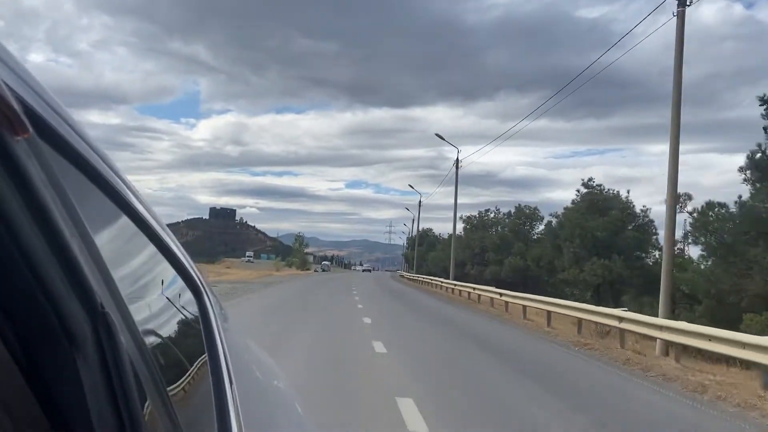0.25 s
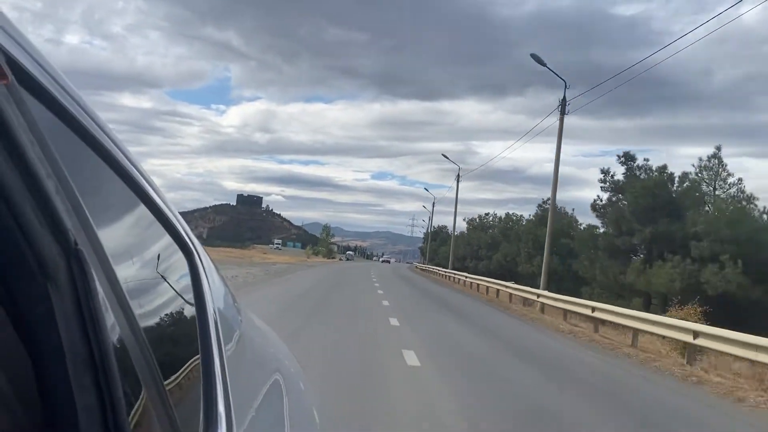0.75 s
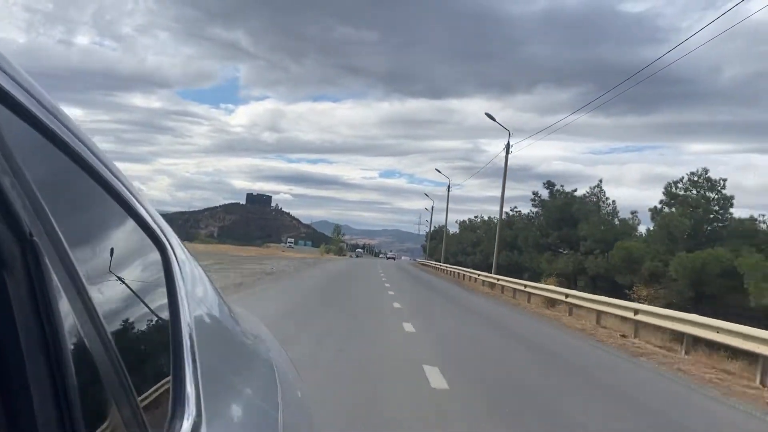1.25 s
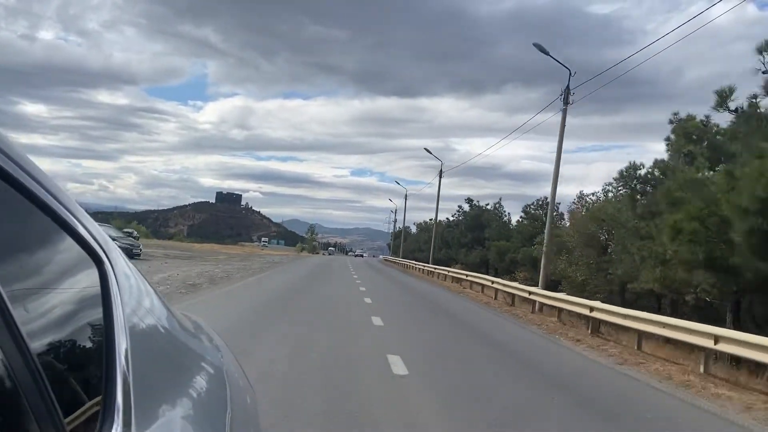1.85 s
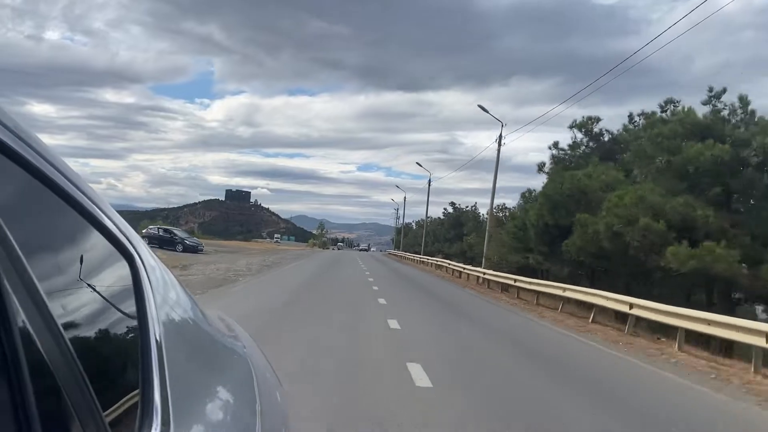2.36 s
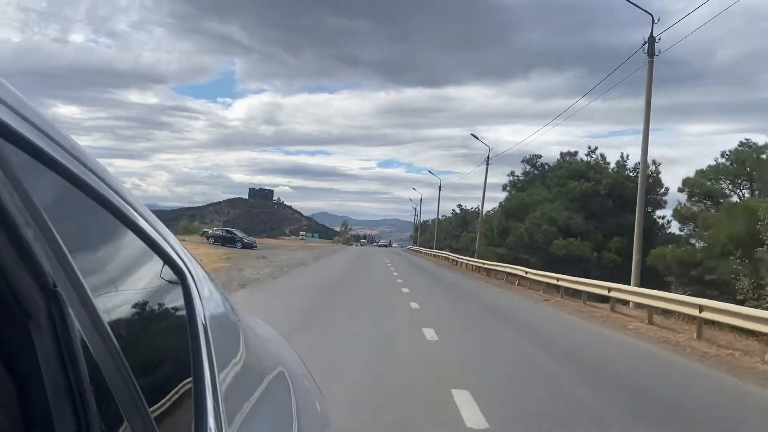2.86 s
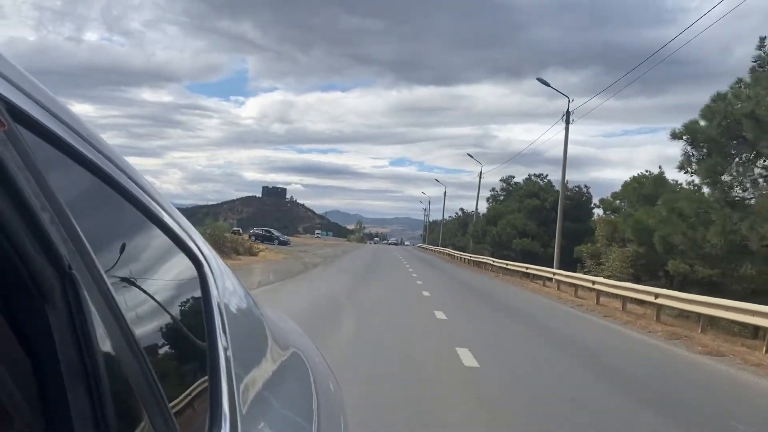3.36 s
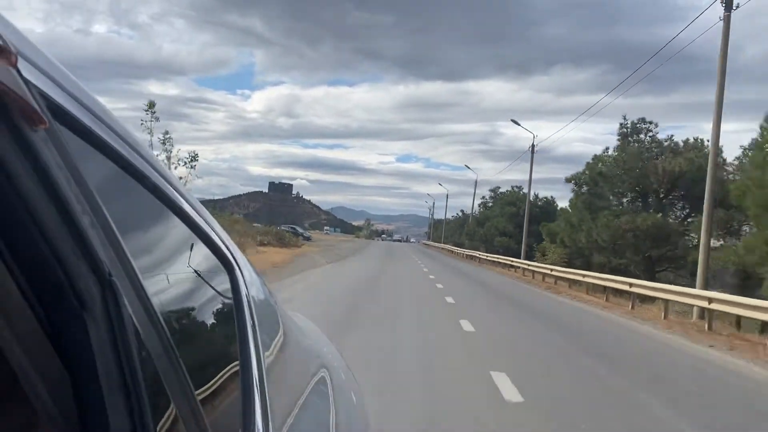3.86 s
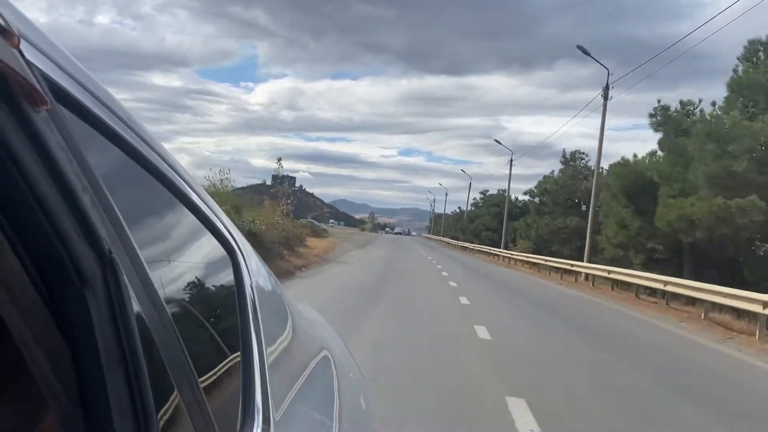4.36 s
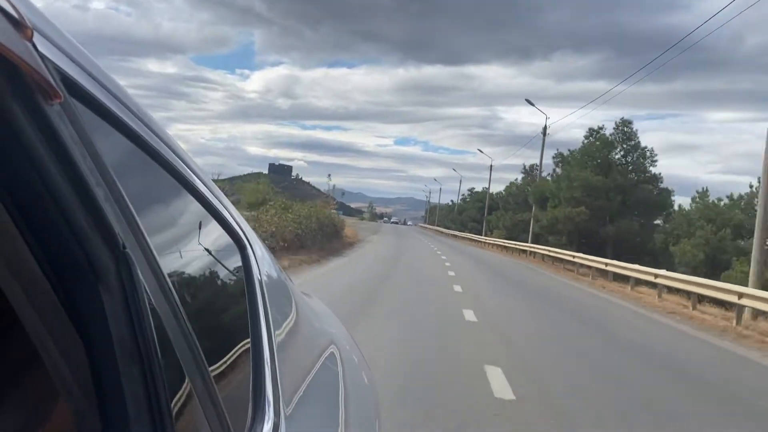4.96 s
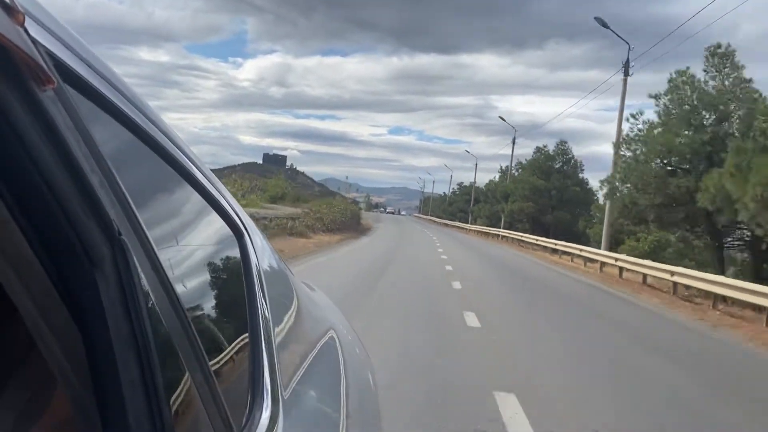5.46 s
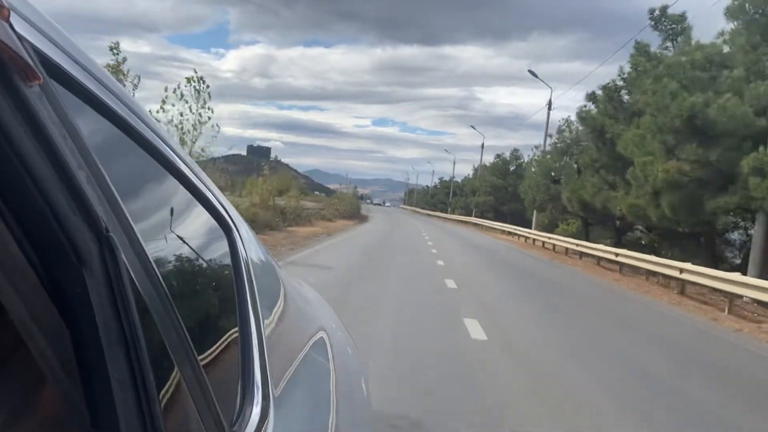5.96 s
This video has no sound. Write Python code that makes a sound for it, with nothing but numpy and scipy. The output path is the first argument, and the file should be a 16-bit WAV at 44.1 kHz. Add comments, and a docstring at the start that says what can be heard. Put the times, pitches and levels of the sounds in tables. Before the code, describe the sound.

Wind strikes the two ports of a handheld microphone outside a moving car's window, very close, dry and outdoors. From 0 s there is low lumpy rumble with a weaker, fluttering rush, strengthening from about 0.4 to 1.1 s with slaps and snaps. It eases around 1.3 s, revives, then dips near 1.8 s. From 2.1 s gusts build, peaking near 2.7 s; after a brief lull around 3 s, a strong, bright, tearing surge fills 3.2-3.6 s with crackling snaps. It sags near 3.9 s, then bursts hard at 4.1-4.5 s with the sharpest snaps and fine ticks. A weaker patch at 4.7-5 s leads to a gust and snap at 5.3 s, a quick drop, and sustained rough blowing from 5.5 s, with a hard snap near 5.8 s. Bass thumps recur throughout; tyre and slipstream hiss swells underneath. It cuts off mid-wind around 6.2 s.

```python
"""Gusts of wind buffet the two microphone ports of a phone held out of the open window of a moving car.
Banded noise on shared random eddies makes a lumpy rumble, a roar, a fluttering rush and a tearing treble.
Timed slaps, treble spits and stalls swing the level; decaying noise makes snaps and ticks, short tones
the shed vortices. Under it runs filtered noise, the hiss of tyres and slipstream, swelling with the gusts."""
import sys
import numpy as np
from scipy import signal
from scipy.fft import rfft, irfft, next_fast_len
from scipy.io import wavfile
from scipy.ndimage import uniform_filter1d

SR = 44100
rng = np.random.default_rng(int(sys.argv[2]) if len(sys.argv) > 2 else 0)


def unload_wav(signal):
    """Save mono or channel-first audio to the path in sys.argv[1] as 16-bit WAV at rate SR, clipped to [-1, 1]."""
    wavfile.write(
        sys.argv[1],
        SR,
        np.round(np.clip(np.atleast_2d(signal).T, -1, 1) * 32767).astype(np.int16),
    )


N = 274302

# eddies slap the ports or spit in the treble:
# (time [s], half-width [s], level change [dB], extra treble [dB], left-right [dB])
SLAPS = [(0.066, 0.0058, 0.5, -5, 1), (0.146, 0.007, 4, -4, 4.5), (0.188, 0.0082, 1.5, -6, 6),
         (0.237, 0.0049, 5.5, 1, 7), (0.287, 0.0036, 6, -7, 10), (0.439, 0.019, 7.5, 1.5, 1.5),
         (0.475, 0.013, 5.5, 3, 1), (0.549, 0.012, 5, 3, 3), (0.647, 0.014, 5, 2, 2),
         (0.706, 0.004, 0.5, 11.5, 11), (0.727, 0.012, 2, -3, 4), (0.792, 0.005, 1.5, 7, 9),
         (0.873, 0.012, 6, -4, 4), (0.904, 0.007, 2.5, 9, 9), (0.963, 0.008, 3.5, 1, 11),
         (1.006, 0.017, 6.5, 0, 6), (1.08, 0.0092, 5, 0.5, 1), (1.197, 0.0035, 3, 8, 12),
         (1.354, 0.011, 5, 2, 1), (1.407, 0.0088, 3, -1, 2), (1.42, 0.004, -1, 9.5, 11),
         (1.446, 0.0049, 11, -3, 4), (1.506, 0.0074, 4.5, -3, 12), (1.535, 0.016, 2, 5, 6),
         (1.657, 0.01, 4.5, -2, 1), (1.691, 0.026, 3, -0.5, 2), (1.796, 0.0086, 8, -14, 5),
         (1.89, 0.011, 5.5, -8, -1), (1.948, 0.0081, 4, -16, 2), (2.043, 0.0033, 9.5, 2.5, 8),
         (2.076, 0.015, 3, -4, 6), (2.098, 0.0051, 5.5, -1, 7), (2.124, 0.0044, 0, 7.5, 14),
         (2.148, 0.0042, 6, 5, 8), (2.256, 0.016, 6.5, 0.5, 5), (2.288, 0.0063, 6.5, -2, 4),
         (2.321, 0.005, 4.5, 3, 5), (2.425, 0.0031, 5.5, 0, 9), (2.5, 0.0082, 5.5, 4.5, 4),
         (2.579, 0.0089, 3, 4.5, 3), (2.621, 0.005, 0, 2, 7), (2.666, 0.003, 6.5, 6, 1),
         (2.727, 0.0084, 3, 3.5, 0), (2.853, 0.008, 4, -1, 1), (2.893, 0.005, 1.5, 0, 9),
         (2.933, 0.0043, 4, -4, -3), (3.072, 0.005, -3, 10, -5), (3.014, 0.0087, 3, 5, -3),
         (3.105, 0.036, 2.5, 0, -1), (3.202, 0.005, 0.5, 5, 6), (3.224, 0.0044, 0.5, 5, 6),
         (3.254, 0.005, 6, 3, 7), (3.287, 0.0044, 6.5, 1, 12), (3.325, 0.01, -0.5, 8, -1),
         (3.412, 0.0046, 4.5, 7, -7), (3.458, 0.0074, -2, 5, 5), (3.521, 0.012, 3, 4, -1),
         (3.622, 0.011, 4, 2.5, -1), (3.683, 0.0043, 0, -2, 10), (3.731, 0.015, 6, -5, 11),
         (3.857, 0.005, 3, -9, -8), (3.959, 0.004, 6.5, -8, -4), (4.002, 0.0056, 5, -1, -5),
         (4.088, 0.0066, 6, 0.5, -3), (4.167, 0.0092, 2, 7, 1), (4.259, 0.005, 1.5, 10.5, 0),
         (4.301, 0.005, -0.5, 5, -2), (4.337, 0.0072, 4, 1, -9), (4.429, 0.0035, 10, 4, 8),
         (4.468, 0.025, 6.5, 4.5, -1), (4.511, 0.0089, 0.5, 4, 0), (4.566, 0.0096, 4.5, 0, -3),
         (4.651, 0.0099, 5.5, 2.5, 7), (4.833, 0.005, 0, -7, -4), (4.856, 0.0069, 6.5, -3, -3),
         (5.011, 0.011, 6, -3, 3), (5.035, 0.0048, 6.5, 0, 6), (5.063, 0.005, 2, -10, 11),
         (5.094, 0.0064, -1, -6, -2), (5.137, 0.0045, 4.5, -4, 10), (5.177, 0.003, -1, 13, -2),
         (5.426, 0.0046, 6, -3, -4), (5.468, 0.004, -2.5, 3, 5), (5.483, 0.0053, 4.5, -3, -7),
         (5.558, 0.005, -2.5, 8, 3), (5.635, 0.006, -1.5, 7, 0), (5.735, 0.0066, -1, 5, 9),
         (5.785, 0.016, 1.5, 10, 2), (5.807, 0.0089, 9.5, 4, 2), (5.856, 0.006, 1.5, 6.5, 6),
         (5.915, 0.0024, 8.5, -1, -5), (6.046, 0.005, 1, 8, -5), (6.092, 0.005, 1.5, 6, 3),
         (6.137, 0.0074, 6, 3.5, 9), (6.202, 0.019, 5, 2.5, -1)]
# random surges of the airflow
SURGE_HZ, SURGE_DB = 22.7, 0.93
# tearing treble: level at zero force, and dB gained per dB of force
TEAR_DB, TEAR_FOLLOWS = -40, 1.01


def from_db(db):
    """Decibels to gain."""
    return 10 ** (np.asarray(db) / 20)


def rms_one(x):
    """Scale to unit power."""
    return x / np.sqrt(np.mean(x ** 2) + 1e-20)


def in_time(rows):
    """One sample-rate curve for each column."""
    s, *columns = np.transpose(rows)
    return [np.interp(np.arange(N) / SR, s, c) for c in columns]


def at_hz(points, hz):
    """Read a table on a log-frequency axis."""
    table = np.array(points)
    return np.interp(np.log(hz), np.log(table[:, 0]), table[:, 1])


def drift(rate_hz):
    """Smooth chance of spread 1 (two-pole low-passed noise), its rare extremes rounded off."""
    # computed at an eighth of the sample rate; the first 4000 values let the filter settle
    r = np.exp(-16 * np.pi * rate_hz / SR)
    white = rng.standard_normal(N // 8 + 4002)
    slow = signal.lfilter([1], [1, -2 * r, r * r], white)[4000:]
    rounded = 4 * np.tanh(rms_one(slow) / 4)
    return np.interp(np.arange(N) / 8, np.arange(len(slow)), rounded)


def at_ports(rate_hz, shared):
    """Smooth chance at the two ports, a share of its power common to both."""
    shared = np.clip(shared, 0, 1)
    own = np.array([drift(rate_hz), drift(rate_hz)])
    return np.sqrt(shared) * drift(rate_hz) + np.sqrt(1 - shared) * own


def coloured(x, spectrum):
    """Give white noise a spectrum; rms 1."""
    size = next_fast_len(N)
    hz = np.maximum(np.fft.rfftfreq(size, 1 / SR), 1)
    return rms_one(irfft(rfft(x, size) * from_db(at_hz(spectrum, hz)), size)[..., :N])


def band(x, low_hz, high_hz):
    """Gentle band-pass."""
    sos = signal.butter(2, [low_hz, min(high_hz, .45 * SR)], "band", fs=SR, output="sos")
    return signal.sosfilt(sos, x)


def evened(x):
    """Even out stereo power over about a thirtieth of a second; quicker flutter stays."""
    power = uniform_filter1d(np.mean(x ** 2, axis=0), size=SR // 30)
    power = uniform_filter1d(power, size=SR // 45)
    return x / np.sqrt(np.maximum(power, 1e-20))


def swells(events):
    """Each event comes on quickly around its moment and fades more slowly; one summed curve per dB column."""
    rise_share, fade_share, reach_s = 0.7, 1.33, .12   # shares of the half-width
    out = np.zeros((len(events[0]) - 2, N))
    for s, width_s, *heights_db in events:
        near = np.arange(max(int((s - reach_s) * SR), 0), min(int((s + reach_s) * SR), N))
        age = (near / SR - s) / width_s
        shape = np.exp(-(age / np.where(age < 0, rise_share, fade_share)) ** 2)
        out[:, near] += np.outer(heights_db, shape)
    return out


def timed_kicks(events, level_db):
    """Single-sample stereo kicks at the listed moments."""
    kicks = np.zeros((2, N))
    for s, peak_db, pan_db in events:
        kicks[:, int(s * SR)] += from_db(peak_db + level_db + np.array([pan_db, -pan_db]) / 2)
    return kicks


def noise_grains(kicks, fall_s, colour):
    """Each kick becomes a decaying grain of random-sign noise, coloured at unchanged overall power."""
    decays = signal.lfilter([1], [1, -np.exp(-1 / (fall_s * SR))], kicks + 1e-18)
    grains = decays * rng.choice([-1, 1], (2, N))
    return coloured(grains, colour) * np.std(grains)


def road_hiss(gust_db):
    """Tyres and slipstream sound from one side: the left port hears them later and turned in phase."""
    # spectrum, relative: (frequency [Hz], density [dB per Hz])
    hiss_colour = [(100, 28), (1000, 35.5), (2500, 12.5), (5000, 13.5), (7000, 7.5), (9000, -1), (11500, 2),
                   (15500, -7)]
    steady_db = -41   # remains in a lull
    start_db, follows, rise_db_per_s = -48, 1.6, 1.75   # slipstream: follows in dB per dB of gust
    lag_s, turn_rad = .000238, 2.1
    slipstream_db = start_db + follows * gust_db + rise_db_per_s * np.arange(N) / SR
    gain = np.hypot(from_db(steady_db), from_db(slipstream_db))
    hiss = coloured(rng.standard_normal(N), hiss_colour) * gain
    size = next_fast_len(N + SR // 20)
    phase = turn_rad + 2 * np.pi * np.fft.rfftfreq(size, 1 / SR) * lag_s
    left = irfft(rfft(hiss, size) * np.exp(-1j * phase), size)[:N]
    return np.array([left, hiss])


def ticks(level_db=-5, fall_s=0.0008):
    """Thin bright ticks: tiny decaying bursts of noise that reach high into the treble."""
    # (time [s], kick before level_db [dB], left-right [dB])
    tick_events = [(1.3617, -46, 0.0), (2.4956, -45, 0.0), (2.5774, -38, 6), (2.6637, -32, -2),
                   (3.2005, -47, 5), (3.415, -37, -1), (3.5697, -44, -0.5), (4.1239, -46, 0.5),
                   (4.2002, -31, 8), (4.2786, -36, 0.5), (4.4073, -40, 0.5), (4.4676, -39, 0.0),
                   (5.2798, -44, -1), (5.2923, -37, 0.5), (5.7417, -44, 3), (5.7911, -29, -2)]
    # spectrum, relative: (frequency [Hz], density [dB per Hz])
    tick_colour = [(1000, -6), (3000, 1), (7000, 0), (11000, 3), (15500, -10)]
    return noise_grains(timed_kicks(tick_events, level_db), fall_s, tick_colour)


def snaps(force_db, level_db=-4, fall_s=0.00067, per_s=70, crackle_db=4, spread_db=5.5, denser=0.54):
    """Air snaps at the port rims in decaying noise: single hard ones, and random crackle that follows the gusts."""
    # single snaps: (time [s], kick before level_db [dB], left-right [dB])
    snap_events = [(0.238, -32, 2), (0.435, -22, -1), (0.474, -14, 4), (0.486, -17.5, 3), (0.562, -20, 0),
                   (0.625, -15, 9), (0.9, -23, 2), (0.909, -22, 2), (0.9655, -20, 2), (1.0116, -14, 2),
                   (1.03, -19, 5), (1.053, -17, 0), (1.146, -24, 5), (1.3625, -17, 7), (1.531, -26, 11),
                   (2.096, -19, -7), (2.317, -14, -1), (2.4964, -17, 7), (2.665, -18, -3), (3.235, -18, 6),
                   (3.322, -17, -7), (3.36, -10, -2), (3.4157, -13, 9), (3.4521, -12, 9), (3.464, -16, -3),
                   (3.521, -24, 3), (3.5715, -23, -9), (3.622, -22, 5), (4.137, -8.5, 10),
                   (4.2005, -20, -4), (4.2603, -6.5, 5), (4.28, -7, 6), (4.336, -21, -2), (4.3552, -11, 9),
                   (4.4086, -7.5, -1), (4.43, -16, 9), (4.469, -19, -3), (5.28, -21, 4), (5.293, -10, 3),
                   (5.7871, -6.5, 11), (5.813, -16, -3)]
    # spectrum, relative: (frequency [Hz], density [dB per Hz])
    snap_colour = [(300, 0), (1200, 11), (2200, 9), (4500, 0), (7000, -9), (10000, -21), (15500, -28)]
    scatter_db = spread_db * np.clip(rng.standard_normal((2, N)), -2, 2)
    sizes = from_db(TEAR_DB + TEAR_FOLLOWS * force_db + crackle_db + scatter_db)
    crackle = sizes * (rng.random((2, N)) < per_s * from_db(denser * force_db) / SR)
    return noise_grains(crackle + timed_kicks(snap_events, level_db), fall_s, snap_colour)


def vortices(force_db, level_db=-22, per_s=80, spread_db=-1.5, follows=0.53, port_scatter_turns=0.67):
    """Vortices shed from the window frame flap a few cycles each, roughly in step at the two ports."""
    out, low_hz, high_hz, cycles = np.zeros((2, N)), 330, 1600, 2.2
    for place, pitch, size, turn, skew in rng.random((int(per_s * N / SR), 5)):
        at = int(place * N)
        hz = low_hz * (high_hz / low_hz) ** pitch
        near = np.arange(max(at - SR // 20, 0), min(at + SR // 20, N))
        turns = (near - at) / SR * hz
        gain = from_db(level_db + follows * force_db[at] + spread_db * (2 * size - 1))
        start = turn + port_scatter_turns * (skew - .5) * np.array([[.5], [-.5]])
        out[:, near] += gain * np.exp(-(turns / cycles) ** 2) * np.sin(2 * np.pi * (turns + start))
    return out


def draw_back(depth_share=0.17, lead_widths=1.1, lead_s=0.0048, width_s=0.0046):
    """Airflow slackens before a swelling slap, in proportion; rises slightly before a negative one; depth in dB."""
    dips = [(s - lead_s - lead_widths * half_s, width_s, depth_share * change_db)
            for s, half_s, change_db, *_ in SLAPS]
    return swells(dips)[0]


def bursts(per_s=120, fade_s=0.0092, rise_s=.0005):
    """Eddies that break on the phone arrive within a millisecond or two and die away; spread 1."""
    rise = np.exp(-1 / (rise_s * SR))
    kicks = rng.uniform(0.32, 1, N) * (rng.random(N) < per_s / SR)
    swirl = np.tanh(signal.lfilter([1], [1, -np.exp(-1 / (fade_s * SR))], kicks + 1e-18))
    swirl = signal.lfilter([1], [1, -2 * rise, rise * rise], swirl)
    return rms_one(swirl - swirl.mean())


def eddies(large_hz=65, small_hz=170, small_share=1.0, large_shared=0.82, small_shared=0.46, burst_share=0.59):
    """Swirl at each port: large eddies mostly cover both, small ones less so, some break abruptly; spread 1."""
    large = at_ports(large_hz, large_shared)
    small = at_ports(small_hz, small_shared)
    return rms_one(large + small_share * small + burst_share * bursts())


def buffet(swirl, grit, level_db, slap_pan_db, low_hz, high_hz, count,
           brighten=0., patchy_db=1.18, lean_share=0.58):
    """One register of pressure noise on the ports: eddies flutter it, and brighten > 0 tilts loud moments up."""
    # turbulence spectrum, relative: (frequency [Hz], density [dB per Hz])
    wind_colour = [(22, -41), (36, -19), (52, 1), (75, 3), (105, 1), (150, -1.5), (280, -8), (450, -9.5),
                   (750, -9), (1200, -14.5), (2050, -24), (2700, -33.5), (4700, -44), (8000, -63),
                   (15000, -122)]
    # correlation of the ports, clipped to -1..1: (frequency [Hz], likeness [1])
    likeness = [(40, 0.88), (250, 0.55), (500, 0.55), (800, 0.42), (1300, -0.05), (2200, 0.5), (4500, 0.5),
                (9000, 2.8)]
    # balance of the ports: (frequency [Hz], left-right [dB])
    port_tilt = [(40, -1.5), (100, -0.5), (200, 1.6), (380, 6), (650, 3), (1200, -3.5), (2000, -4.5),
                 (3000, 1.5), (9000, -3.5)]
    # swing per unit of swirl: (frequency [Hz], swing [dB])
    flutter_swing = [(50, -0.5), (150, 0.5), (400, 1.5), (1000, 2.5), (2500, 2), (5000, 3), (12000, 10)]
    # swing per unit of grit: (frequency [Hz], swing [dB])
    grit_swing = [(400, -1), (1200, 2.4), (2400, 3.5), (8000, 4)]
    # port the airflow favours, before mean removal and lean_share: (time [s], left-right [dB])
    lean = [(0, -0.5), (0.7, -2.5), (1.4, -4), (2.3, -1.5), (3.0, 1.5), (3.7, 2.5), (4.5, 4.5), (5.05, 1.5),
            (5.4, 1.5), (6.22, 2)]
    lean_db = in_time(lean)[0]
    lean_db = lean_share * (lean_db - lean_db.mean())
    sides, out = np.array([[1], [-1]]), 0
    edges = np.geomspace(low_hz, high_hz, count + 1)
    shaped = coloured(rng.standard_normal((2, 2, N)), wind_colour)   # neighbouring bands get unrelated noise
    for k, (low, high) in enumerate(zip(edges, edges[1:])):
        hz = np.sqrt(low * high)
        mid, side = band(shaped[k % 2], low, high)
        alike = np.clip(at_hz(likeness, hz), -1, 1)
        noise = np.sqrt(1 + alike) * mid + np.sqrt(1 - alike) * side * sides
        flutter_db = at_hz(flutter_swing, hz) * swirl + at_hz(grit_swing, hz) * grit
        flutter = rms_one(from_db(flutter_db + patchy_db * drift(33.0)))
        pan_db = at_hz(port_tilt, hz) + lean_db + slap_pan_db
        tilt_db = brighten * (level_db - level_db.mean()) * np.log2(hz / low_hz)
        out = out + noise * flutter * from_db(tilt_db + sides * pan_db / 2)
    return from_db(level_db) * evened(out)


def turbulence(force_db, treble_db, pan_db, rumble_db=1.0):
    """Rumble, roar, rush and tearing treble all ride on the same eddies."""
    # bass between thumps, before rumble_db: (time [s], level [dB])
    rumble_level = [(0, -27.5), (0.31, -26), (0.42, -22), (0.85, -20.5), (1.2, -21.0), (1.8, -25),
                    (2.1, -21.5), (2.62, -21), (2.88, -26.0), (3.14, -16.5), (3.5, -21.5), (3.95, -25),
                    (4.45, -19.5), (4.8, -26.5), (5.1, -22.5), (5.7, -25.5), (5.9, -19), (6.22, -24)]
    # big slow eddies thump the ports: (time [s], half-width [s], rumble swell [dB])
    thumps = [(0.068, 0.012, 5), (0.384, 0.012, 5.5), (0.487, 0.012, 3), (0.82, 0.025, 5.5),
              (0.91, 0.012, 3), (1.03, 0.014, 3), (1.378, 0.016, 6), (1.517, 0.014, 3.5), (2.056, 0.012, 5),
              (2.243, 0.028, 3), (2.616, 0.018, 5), (2.781, 0.028, 3.5), (2.88, 0.014, 3), (3.12, 0.014, 4),
              (3.25, 0.016, 3), (3.35, 0.02, 4), (3.511, 0.018, 6.5), (3.76, 0.025, 8.5), (3.936, 0.016, 4),
              (4.09, 0.018, 6.5), (4.292, 0.016, 7), (4.364, 0.012, 4), (4.516, 0.014, 4), (4.59, 0.012, 3),
              (4.671, 0.018, 6), (4.831, 0.014, 5), (4.953, 0.016, 7), (5.112, 0.025, 3.5),
              (5.353, 0.012, 9), (5.48, 0.018, 7.5), (5.575, 0.018, 7.5), (5.65, 0.012, 5),
              (5.7, 0.012, 4.5), (5.887, 0.015, 6), (6.113, 0.012, 3.5)]
    # the rumble sags for a moment: (time [s], half-width [s], depth [dB])
    sags = [(0.111, 0.018, 7), (0.707, 0.012, 7), (0.933, 0.012, 4), (1.288, 0.018, 8), (1.347, 0.012, 8),
            (1.477, 0.012, 6), (1.583, 0.012, 5), (1.785, 0.014, 5), (1.85, 0.018, 5), (1.943, 0.018, 3.5),
            (2.36, 0.012, 4), (2.571, 0.012, 4), (2.73, 0.016, 4), (3.19, 0.014, 4), (3.629, 0.014, 3),
            (3.872, 0.018, 4), (4.16, 0.012, 4), (4.39, 0.01, 5), (4.548, 0.01, 5), (4.625, 0.01, 4),
            (5.018, 0.012, 7), (5.622, 0.012, 4), (5.977, 0.012, 9), (6.081, 0.012, 5.5)]
    bottom_hz, roar_hz, rush_hz, tear_hz, top_hz = 20, 165, 420, 2200, 18000
    rumble_surge_db, roar_surge_db = 1.17, 1.63
    roar_start_db, roar_fall_db_per_s = -22.5, 0.32
    roar_follows, roar_follows_bass = 0.64, 0.27   # dB per dB
    rush_start_db, rush_follows = -22, 1
    swirl = eddies()
    grit = at_ports(284, 0.69)   # the tiniest eddies make the treble grainy

    bass_db = in_time(rumble_level)[0] + rumble_db + swells(thumps)[0] - swells(sags)[0]
    bass_db = bass_db + rumble_surge_db * drift(SURGE_HZ)
    rumble = buffet(swirl, grit, bass_db, 0, bottom_hz, roar_hz, count=4)

    roar_db = roar_start_db - roar_fall_db_per_s * np.arange(N) / SR + roar_follows * force_db
    roar_db = roar_db + roar_follows_bass * (bass_db - bass_db.mean()) + roar_surge_db * drift(SURGE_HZ)
    roar = buffet(swirl, grit, roar_db, 0, roar_hz, rush_hz, count=3)

    rush_db = rush_start_db + rush_follows * force_db
    rush = buffet(swirl, grit, rush_db, pan_db, rush_hz, tear_hz, count=6, brighten=0.093)

    tear_db = TEAR_DB + TEAR_FOLLOWS * force_db + treble_db
    tear = buffet(swirl, grit, tear_db, pan_db, tear_hz, top_hz, count=6, brighten=0.01)
    return rumble + roar + rush + tear


def scene():
    """Wind over road hiss; gusts, slaps, stalls and surges add up to one force on the ports."""
    # gust strength, before mean removal: (time [s], level [dB])
    gust = [(0, -33.5), (0.17, -27.5), (0.34, -27.5), (0.45, -24.5), (0.7, -22.5), (1.02, -23.0),
            (1.27, -26.5), (1.42, -23.5), (1.78, -30.5), (2, -26.5), (2.08, -22), (2.25, -22.5),
            (2.38, -21.5), (2.7, -16.5), (2.8, -21), (3.02, -23.5), (3.25, -15.5), (3.45, -14.5),
            (3.62, -17), (3.7, -21), (3.89, -22.5), (4.05, -20), (4.2, -14.5), (4.47, -19), (4.6, -20),
            (4.72, -22), (4.93, -24), (5.05, -21), (5.28, -15), (5.37, -22.5), (5.5, -17.5), (5.82, -17.5),
            (6, -17.5), (6.22, -20.5)]
    # the airflow drops away for a moment: (time [s], half-width [s], depth [dB])
    stalls = [(0.098, 0.018, 5.5), (0.205, 0.008, 7.5), (0.322, 0.008, 6.0), (0.986, 0.005, 5),
              (1.158, 0.008, 4.5), (1.236, 0.008, 4.5), (1.821, 0.007, 5), (2.307, 0.005, 4),
              (2.34, 0.008, 7.0), (2.528, 0.007, 7), (2.605, 0.005, 5.5), (2.781, 0.008, 7.5),
              (2.919, 0.005, 8.5), (3.379, 0.012, 4.5), (3.498, 0.008, 6.5), (3.538, 0.008, 7.5),
              (3.562, 0.004, 6.5), (3.665, 0.005, 4.5), (3.841, 0.008, 6), (4.815, 0.005, 4.5),
              (4.921, 0.008, 5.0), (4.987, 0.008, 5.0), (5.171, 0.018, 5.5), (5.251, 0.007, 6.5),
              (5.338, 0.012, 7.5), (5.529, 0.012, 6.0), (5.618, 0.012, 4.5), (5.902, 0.005, 6.0),
              (6.062, 0.008, 5.5)]
    hiss_flutter_share = 0.95   # of the quick swings
    gust_db, = in_time(gust)
    slow_db = gust_db - gust_db.mean()
    slap_db, treble_db, pan_db = swells(SLAPS)
    quick_db = slap_db - draw_back() - swells(stalls)[0] + SURGE_DB * drift(SURGE_HZ)
    force_db = slow_db + quick_db
    background = road_hiss(slow_db + hiss_flutter_share * quick_db)
    details = ticks() + snaps(force_db) + vortices(force_db)
    return background + details + turbulence(force_db, treble_db, pan_db)


def record(dry, turn_hz=465, turn_q=0.88, cutoff_hz=15900, end_fade_s=.003):
    """The left channel turns in phase (all-pass) through the low middle; peaks round off, the top is cut."""
    w = 2 * np.pi * turn_hz / SR
    width = np.sin(w) / (2 * turn_q)
    poles = np.array([1 + width, -2 * np.cos(w), 1 - width])
    ports = np.array([signal.lfilter(poles[::-1], poles, dry[0]), dry[1]])
    ports = ports * np.minimum(np.arange(N, 0, -1) / (end_fade_s * SR), 1)   # no click at the end
    rounded = ports / (1 + (ports / .92) ** 6) ** (1 / 6)
    return signal.sosfilt(signal.ellip(10, .1, 80, cutoff_hz, fs=SR, output="sos"), rounded)


dry = scene()
out = record(dry)
unload_wav(out)
```